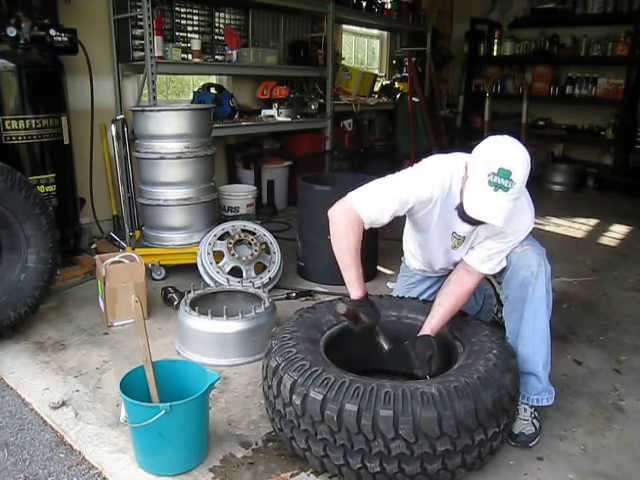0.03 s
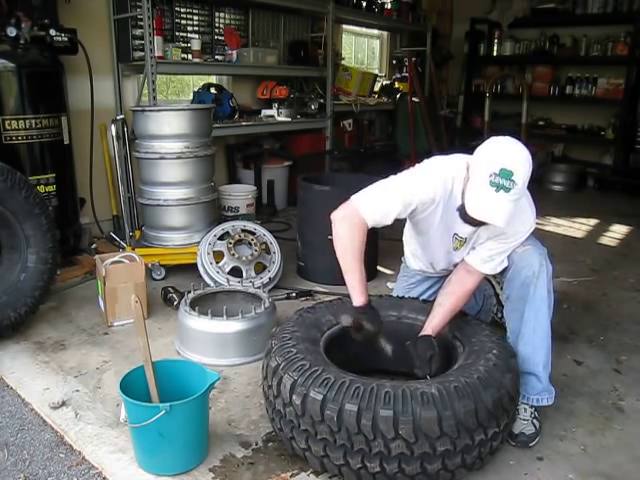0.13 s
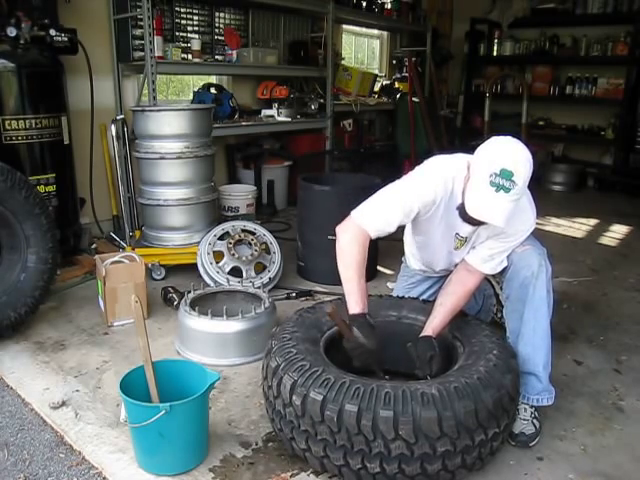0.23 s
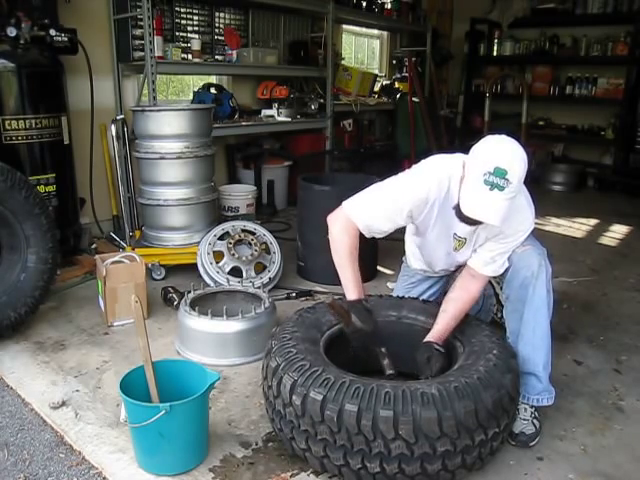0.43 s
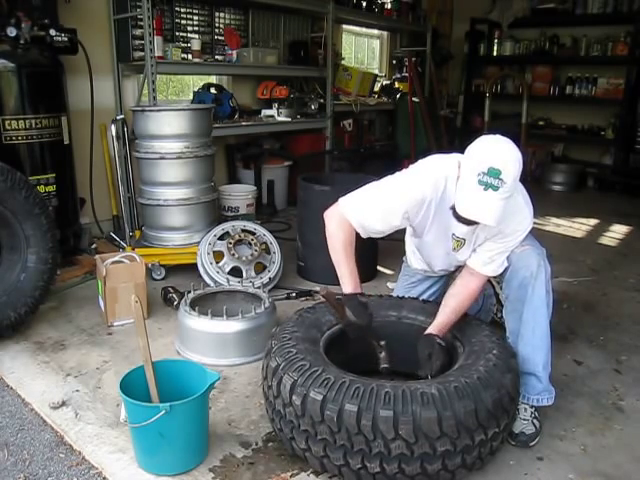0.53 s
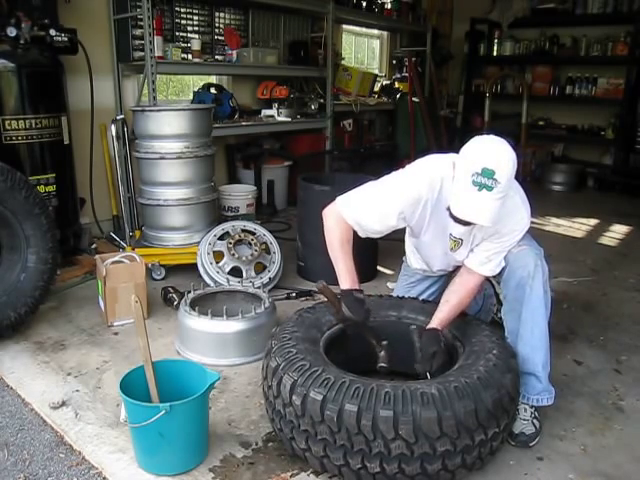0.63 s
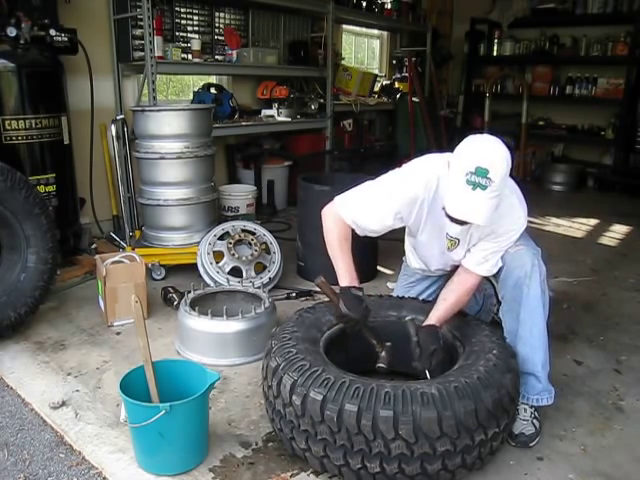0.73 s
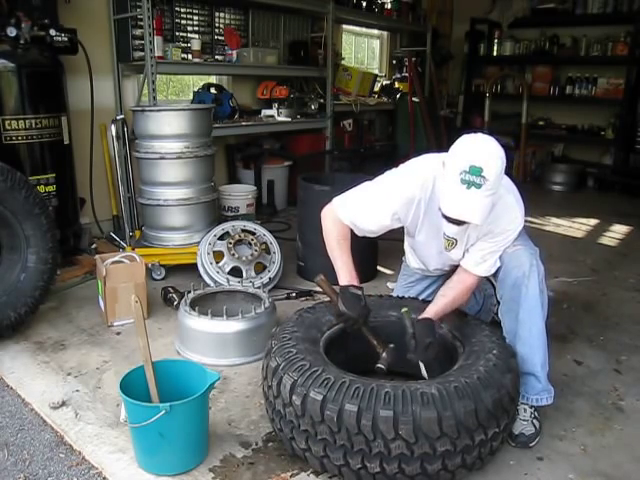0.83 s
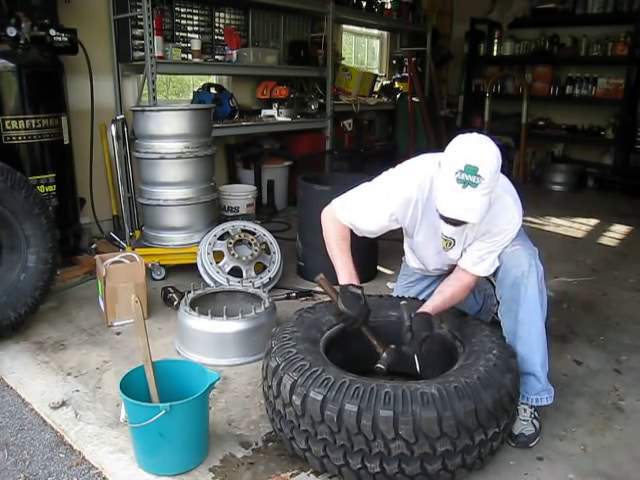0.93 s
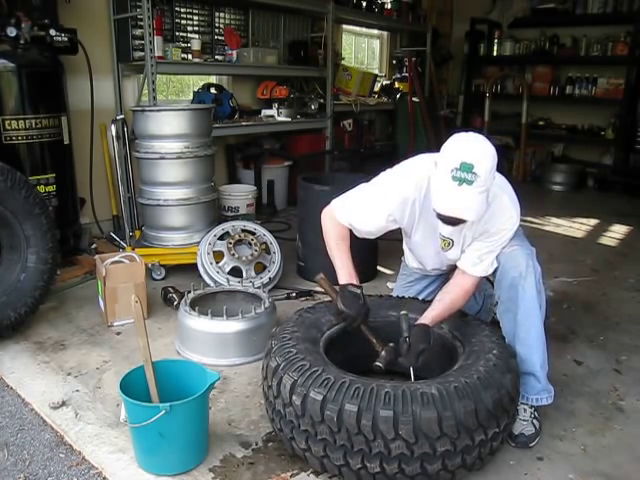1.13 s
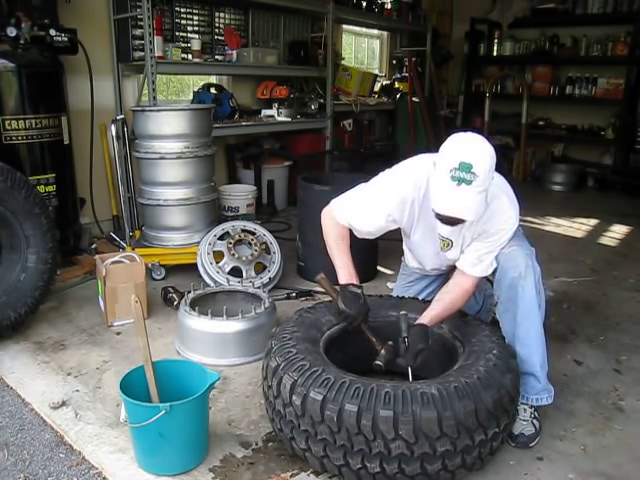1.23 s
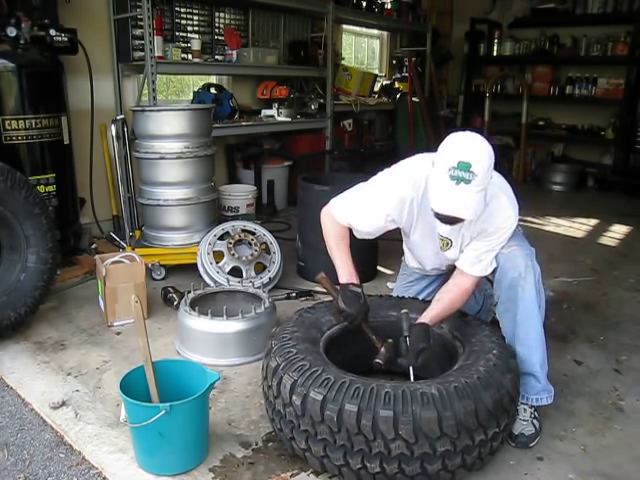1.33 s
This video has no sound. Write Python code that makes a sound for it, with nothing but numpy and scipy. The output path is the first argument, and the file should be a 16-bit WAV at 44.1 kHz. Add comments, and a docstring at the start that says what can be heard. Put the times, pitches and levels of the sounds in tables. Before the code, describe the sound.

One mallet blow thuds inside a big tyre at about 0.2 seconds, after a faint tick and a low rumble of handled rubber. The dull knock just overloads the microphone, and its short hollow ring and garage echo fade by about 0.6 seconds, along with more soft rumbles and ticks. A few faint ticks of small parts return around 1.2 to 1.3 seconds. A soft steady hiss runs throughout.

```python
"""A soft steady hiss, with the low rumble of handled rubber and faint ticks of small parts.
Then one mallet blow lands inside a big tyre lying on a garage floor. Heavily damped modes of the
rubber give a dull thud that just overloads the microphone; the enclosed air and the rim add a short
hollow ring. The garage answers with reflections, and a few more rumbles and ticks follow."""
import sys
import numpy as np
from scipy import signal
from scipy.fft import rfft, irfft
from scipy.io import wavfile
from scipy.ndimage import uniform_filter1d

SR = 44100
rng = np.random.default_rng(int(sys.argv[2]) if len(sys.argv) > 2 else 0)


def wav_record(signal):
    """Record a signal, one row per channel, as 16-bit PCM in the file named by sys.argv[1]."""
    frames = np.transpose(np.atleast_2d(signal))
    bounded = np.clip(frames, -1, 1)
    # unit amplitude maps onto the largest positive 16-bit level
    quanta = np.round(bounded * 32767).astype(np.int16)
    wavfile.write(sys.argv[1], SR, quanta)


N = 61739
BLOW_S = 0.2278


def undb(db):
    """Amplitude ratio of a level: tenfold for every 20 dB."""
    return 10 ** (np.asarray(db) / 20)


def since(start_s):
    """Seconds elapsed since an onset, zero before it."""
    return np.maximum(np.arange(N) / SR - start_s, 0)


def fade(age, t60_s):
    """Exponential decay of a damped system: 60 dB lost in t60_s."""
    return np.exp(-np.log(1000) * age / t60_s)


def swell(centre_s, sigma_s):
    """Gaussian envelope: a bell-shaped rise and fall."""
    return np.exp(-.5 * ((np.arange(N) / SR - centre_s) / sigma_s) ** 2)


def noise(spectrum):
    """Spectral shaping: white noise filtered to (frequency_hz, density_db) points, at rms 1."""
    hz, db = np.array(spectrum, float).T
    bins_hz = np.maximum(np.arange(N // 2 + 1) * SR / N, 1)
    gain = undb(np.interp(np.log(bins_hz), np.log(hz), db))
    shaped = irfft(rfft(rng.standard_normal(N)) * gain, N)
    return shaped / shaped.std()


def drift(samples):
    """Moving averages smooth noise into a slow fluctuation of standard deviation 1."""
    smooth = uniform_filter1d(uniform_filter1d(rng.standard_normal(N), samples), samples)
    return (smooth - smooth.mean()) / smooth.std()


def hiss():
    """Broadband noise floor: nearly stationary, a little quieter at first."""
    # frequency_hz, density_db
    spectrum = [(20, -11.5), (60, -7.5), (120, -5), (160, -7.5), (230, -3.5), (350, -5), (500, -3),
                (900, -1.5), (1150, -3), (1500, -7), (2500, -9), (4700, -14), (8000, -21.5), (13300, -26.5),
                (17000, -38.5)]
    early_db = np.interp(since(0), [0, 0.49], [-1.5, 0])
    return noise(spectrum) * undb(-38.5 + early_db + 0.33 * drift(samples=3000))


def rubber_rumble():
    """Handled rubber radiates low-frequency noise, amplitude-modulated in soft swells."""
    # centre_s, sigma_s, level_db
    swells = [(0.052, 0.041, -50.5), (0.147, 0.02, -37.5), (0.2, 0.009, -43.5), (0.259, 0.037, -33),
              (0.37, 0.011, -30), (0.448, 0.028, -38), (1.279, 0.0092, -44.5), (1.383, 0.017, -50.5)]
    # frequency_hz, density_db
    spectrum = [(20, -2.5), (45, -0.5), (80, 0), (140, -3.5), (250, -17), (500, -15), (2000, -68)]
    return noise(spectrum) * sum(undb(db) * swell(centre_s, sigma_s) for centre_s, sigma_s, db in swells)


def ticks():
    """Brief contacts of small parts give bright transients, each with a faint reverberant tail."""
    # start_s, level_db, t60_s
    contacts = [(0.107, -45.5, 0.015), (0.297, -49, 0.036), (0.448, -51, 0.015), (0.553, -44, 0.012),
                (1.178, -50, 0.012), (1.296, -40.5, 0.0076), (1.3028, -45.5, 0.019)]
    # frequency_hz, density_db
    spectrum = [(1000, -28), (6000, -4), (10000, -5.5), (11500, 4), (14500, -8), (17000, -19)]
    sound = np.zeros(N)
    for start_s, level_db, t60_s in contacts:
        age = since(start_s)
        envelope = fade(age, t60_s) + undb(-9.5) * fade(age, t60_s=0.14)
        sound += noise(spectrum) * undb(level_db) * (age > 0) * envelope
    return sound


def driven_modes(modes, start_s, contact_s):
    """Damped modes convolved with a force pulse: the longer the contact, the duller the sound."""
    age = since(start_s)
    response = sum(undb(db) * np.cos(2 * np.pi * hz * age) * fade(age, t60_s) for hz, db, t60_s in modes)
    pulse_time_s = np.arange(-100, 101) / SR
    force = np.exp(-.5 * (pulse_time_s / (contact_s / 6)) ** 2)
    return np.convolve(response * (age > 0), force / force.sum(), "same")


def mallet_blow():
    """Impact excitation: the contact cracks, the damped rubber thuds, and the air and rim resonate."""
    # force pulses as the head touches and the part seats: delay_s, contact_s, level_db
    pushes = [(0.0001, 0.00099, -2), (0.0017, 0.00094, 0), (0.0038, 0.00097, -1.5)]
    # heavily damped modes of the rubber: pitch_hz, level_db, t60_s
    rubber_modes = [(125, -18.5, 0.075), (199, -5.5, 0.047), (302, -26, 0.0092), (502, -8, 0.015),
                    (676, -17, 0.041), (1115, -14, 0.021), (1240, -34, 0.0047), (1564, -7, 0.028),
                    (2200, -3.5, 0.023)]
    # resonances of the enclosed air and the rim: pitch_hz, level_db, t60_s
    ring_modes = [(85.6, -48, 0.7), (202.4, -15.5, 0.3), (255.9, -15, 0.4), (303, -23, 0.35),
                  (519, -18, 0.21), (634, -29, 0.25), (696.6, -27.5, 0.3), (745, -18.5, 0.27),
                  (769.6, -25.5, 0.5), (941, -24.5, 0.18), (1552, -42, 0.48)]
    # contact noise: frequency_hz, density_db
    crack_spectrum = [(150, -13), (500, -8.5), (1150, 6.5), (2400, 6.5), (3300, -5.5), (4500, -7.5),
                      (9000, -11.5), (13000, -10.5), (17000, -24)]
    thud = sum(undb(level_db) * driven_modes(rubber_modes, BLOW_S + delay_s, contact_s)
               for delay_s, contact_s, level_db in pushes)
    delay_s, contact_s, _ = pushes[1]  # the strongest push drives the ring
    ring = driven_modes(ring_modes, BLOW_S + delay_s, contact_s)
    vibration = undb(0.5) * thud + undb(1) * ring
    crack_envelope = swell(BLOW_S + 0.0025, sigma_s=0.0015) * (since(BLOW_S) > 0)
    crack = undb(-21) * noise(crack_spectrum) * crack_envelope
    cutoff_hz = 85  # slower motion of the rubber hardly moves the air
    radiation = signal.butter(2, cutoff_hz, "high", fs=SR, output="sos")
    return signal.sosfilt(radiation, vibration) + crack


def garage_reverberation():
    """Dense reflections merge into noise: near walls answer first, far shelves later and brighter."""
    # frequency_hz, density_db
    near_spectrum = [(40, -26), (110, -7.5), (170, -5.5), (240, 9), (370, -13.5), (520, -6), (750, -6.5),
                     (1200, -14.5), (2200, -25), (4000, -43.5), (14000, -49.5)]
    # frequency_hz, density_db
    far_spectrum = [(150, -29), (450, -5), (700, 8.5), (1100, -13), (1600, -3.5), (2300, -12.5),
                    (3500, -17.5), (14000, -37.5)]
    build_s, hold_s, sag_db_per_s, far_delay_s = 0.0028, 0.1, 16, 0.09
    age = since(BLOW_S)
    plateau = (1 - np.exp(-age / build_s)) * undb(-22 - sag_db_per_s * age)
    near = noise(near_spectrum) * plateau * fade(since(BLOW_S + hold_s), t60_s=0.35)
    far = noise(far_spectrum) * undb(-31.5) * swell(BLOW_S + far_delay_s, sigma_s=0.037) * (age > 0)
    return near + far


def scene():
    """Superposition: the pressures of all sources add at one microphone."""
    return (hiss() + rubber_rumble() + ticks() + mallet_blow() + garage_reverberation())[None, :]


def record(dry):
    """Saturation and band limiting: the microphone clips the blow's peak and cuts the highest treble."""
    cutoff_hz = 17000
    lowpass = signal.ellip(8, .2, 80, cutoff_hz, fs=SR, output="sos")
    return signal.sosfilt(lowpass, np.clip(dry, -1, 1))


dry = scene()
out = record(dry)
wav_record(out)
```